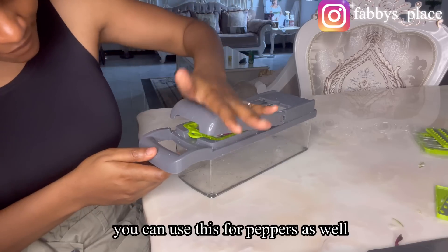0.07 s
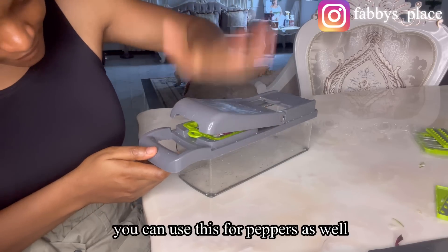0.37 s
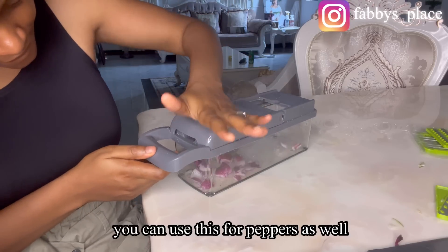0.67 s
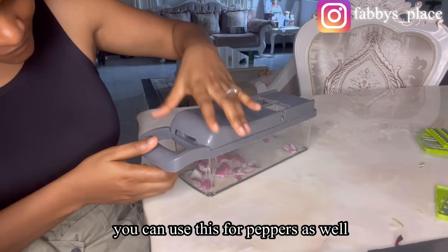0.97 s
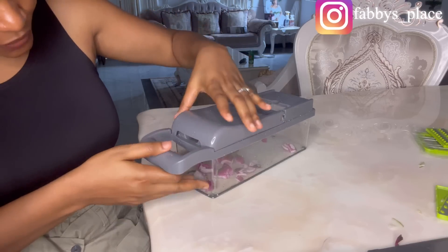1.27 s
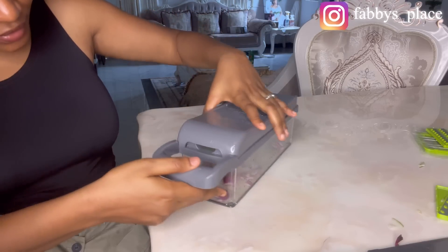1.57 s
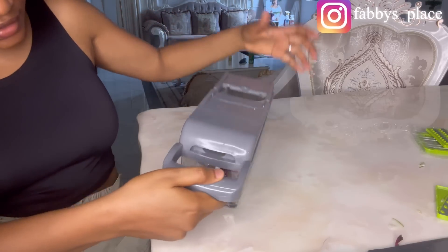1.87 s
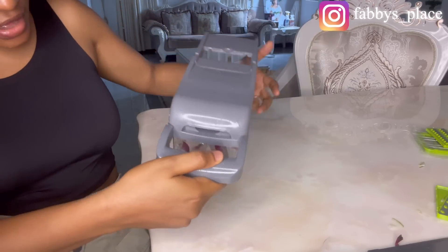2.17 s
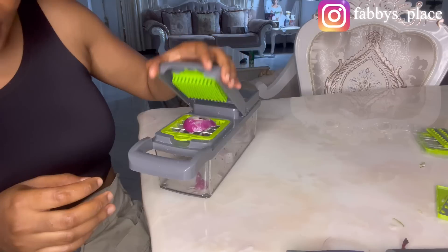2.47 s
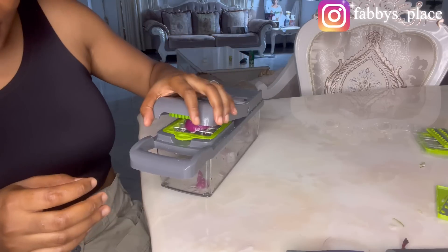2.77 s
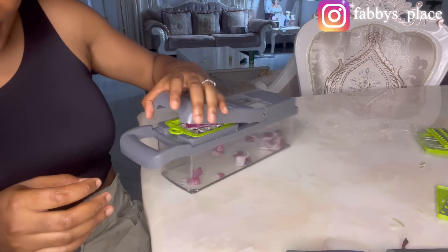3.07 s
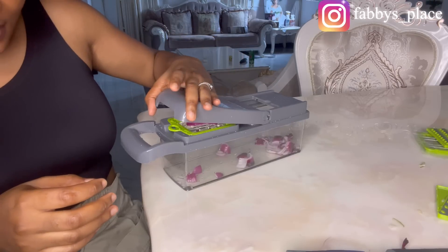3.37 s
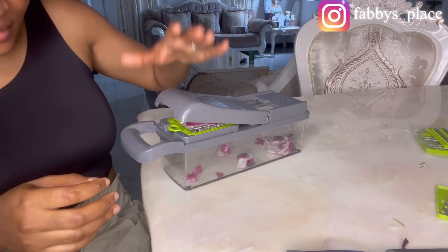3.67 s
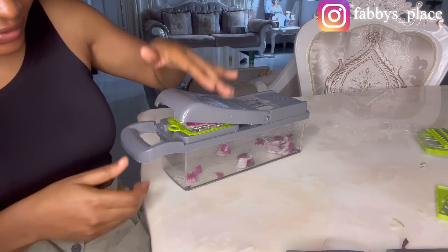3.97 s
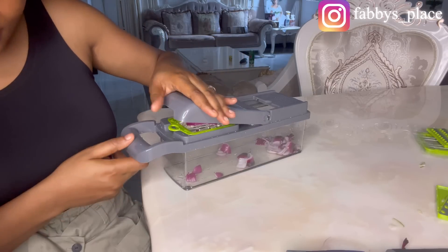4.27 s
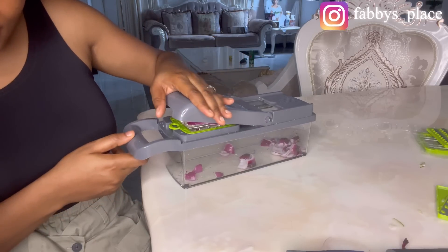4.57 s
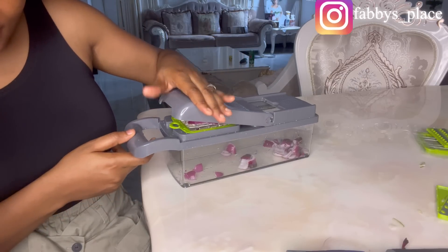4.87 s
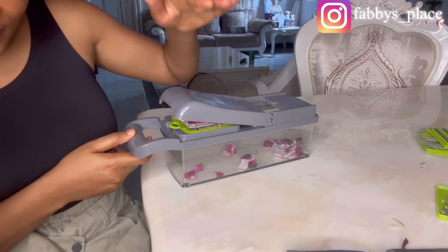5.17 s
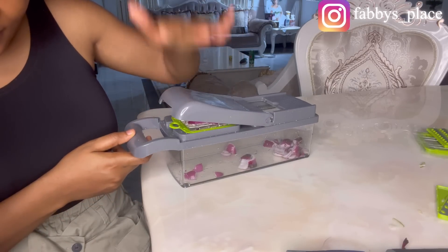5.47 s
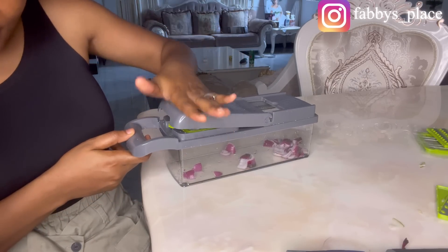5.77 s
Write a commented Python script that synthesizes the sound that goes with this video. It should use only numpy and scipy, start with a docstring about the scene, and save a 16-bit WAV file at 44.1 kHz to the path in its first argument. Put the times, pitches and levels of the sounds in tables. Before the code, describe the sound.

A plastic vegetable chopper slams shut with a loud crunching clack, knocks hollowly as it is handled, then clacks shut more softly.

```python
"""Hollow knocks, ticks and rubs of a plastic vegetable chopper on a stone table in a live, humming room.
A palm slams the lid, hard at 0.4 s and softer at 5.5 s: the onion crunches into the grid and drives
the box, then the lid cracks onto the rim and the table thuds. In between the box is set down and handled.
A limiter ducks the hardest slam and lets its echo swell back."""
import sys
import numpy as np
from scipy import signal
from scipy.fft import rfft, irfft, next_fast_len
from scipy.io import wavfile
from scipy.ndimage import uniform_filter1d, minimum_filter1d

SR = 44100
rng = np.random.default_rng(int(sys.argv[2]) if len(sys.argv) > 2 else 0)


def dump_mix(stems):
    """Bounce the given channels to the path in sys.argv[1] as a 16-bit WAV at rate SR."""
    frames = np.atleast_2d(stems).T  # one column per channel
    limited = np.clip(frames, -1, 1)  # hard clip at full scale
    pcm = np.round(limited * 32767).astype(np.int16)
    wavfile.write(sys.argv[1], SR, pcm)


N = 265129
TIME = np.arange(N) / SR
PADDED = next_fast_len(N + 4096, real=True)

# palm slams: t/s, lid travel/s, grid crack/dB, onion blow/dB, rim blow/dB, rim crack/dB,
# lid ring re rim blow/dB, low table mode/dB, high table mode/dB
SLAMS = [(0.4018, 0.0114, 5, 5, -3, 13, -15.5, -20, -15.5),
         (5.5330, 0.0034, -6.5, -23.5, -14, -8, -10, -29, -39)]


def from_db(db):
    """Decibels to gain."""
    return 10 ** (np.asarray(db) / 20)


def rms_one(x):
    """Scale to unit power."""
    return x / np.sqrt(np.mean(x ** 2) + 1e-20)


def at_hz(points, hz):
    """Interpolate a table over log frequency."""
    points = np.array(points)
    return np.interp(np.log(np.maximum(hz, 1)), np.log(points[:, 0]), points[:, 1])


def decay(t, t60_s):
    """Envelope from t = 0, down 60 dB at t60_s."""
    return (t >= 0) * from_db(-60 * np.maximum(t, 0) / t60_s)


def cut(x, hz, kind, order=2):
    """Causal low-pass or high-pass."""
    sos = signal.butter(order, np.clip(hz, 10, .45 * SR), kind, fs=SR, output="sos")
    return signal.sosfilt(sos, x)


def bins(size):
    """FFT bin frequencies in Hz."""
    return np.arange(size // 2 + 1) * SR / size


def filtered(x, response):
    """Apply gain and phase per bin."""
    return irfft(rfft(x, PADDED) * response, PADDED)[..., :N]


def noise(gain, size):
    """Random-phase noise, gain per bin."""
    return irfft(gain * np.exp(2j * np.pi * rng.random(size // 2 + 1)), size) * np.sqrt(size)


def add(track, start_s, sound):
    """Mix a sound in at start_s."""
    start = max(round(start_s * SR), 0)
    track[start:start + len(sound)] += sound[:N - start]


def diffuse(spectrum, size=PADDED):
    """Stereo noise from all around; the channels are most alike in the bass."""
    likeness = [(100, .92), (260, 0.27), (500, -0.1), (700, 0.058), (1200, -0.52), (3000, 0.04),
                (7500, -0.044), (9000, -1.2), (10500, 0.33), (15000, 0.53)]  # left-right correlation: f/Hz, value before clipping
    hz = bins(size)
    gain = from_db(at_hz(spectrum, hz))
    alike = np.clip(at_hz(likeness, hz), -.98, .98)
    mid = noise(gain * np.sqrt(1 + alike), size)
    side = noise(gain * np.sqrt(1 - alike), size)
    return np.array([mid + side, mid - side])[:, :N] / np.sqrt(2)


def burst(spectrum, t60_s, rise_s=0.0014, size=16384):
    """Many overlapping, well damped modes struck at once, evened out and shaped to a spectrum."""
    t = np.arange(size) / SR
    envelope = decay(t, t60_s) * (1 - decay(t, rise_s))
    crowd = rfft(rng.standard_normal(size) * envelope)
    even = crowd / np.sqrt(uniform_filter1d(abs(crowd) ** 2, size=14))
    sound = irfft(even * from_db(at_hz(spectrum, bins(size))))[:size // 2]
    return sound * np.linalg.norm(envelope) / np.linalg.norm(sound)


def ring(modes):
    """One second of modes struck together."""
    t = TIME[:SR]
    return sum(from_db(db) * np.sin(2 * np.pi * hz * t) * decay(t, t60_s) for hz, db, t60_s in modes)


def air():
    """Steady, bass-heavy room noise."""
    air_spectrum = [(25, -25.5), (50, -5.5), (87, -8.5), (117, -7), (141, -10.5), (180, -9), (326, -7),
                    (405, -13), (960, -22.5), (2300, -33), (3300, -46), (5000, -49.5), (12500, -55),
                    (16000, -70)]  # f/Hz, relative level/dB
    return from_db(-55.5) * rms_one(diffuse(air_spectrum))


def hum(width_hz=5, waver=0.57, step=64):
    """Appliance motor tones that waver in strength and phase."""
    motor_tones = [(70, -66), (113.5, -61.5), (301.5, -67), (323, -59.5), (377, -81), (937, -80.5)]  # f/Hz, level/dB
    size, out = PADDED // step, 0
    slow = 1 / (1 + (bins(size) / step / width_hz) ** 2)
    coarse_s = np.arange(size) * step / SR
    for hz, db in motor_tones:
        a, b = (waver * np.interp(TIME, coarse_s, rms_one(noise(slow, size))) for _ in range(2))
        phase = 2 * np.pi * hz * TIME
        out += from_db(db) * rms_one((1 + a) * np.sin(phase) + b * np.cos(phase))
    return out


def struck(ringing, low_hz, high_hz, clatter_db):
    """Plastic rings and clatters in the band the contact excites."""
    clatter_spectrum = [(30, -23.5), (100, -15), (180, -5), (350, 3.5), (800, 5), (1300, -2), (2200, -4),
                        (4000, -9.5), (8000, -15), (16000, -19.5)]  # f/Hz, relative level/dB
    body = ringing.copy()
    add(body, 0, from_db(clatter_db) * burst(clatter_spectrum, t60_s=0.075))
    return cut(cut(body, low_hz, "high", order=4), high_hz, "low")


def knocks(box, lid, rise_s=0.018, hand_t60_s=0.12):
    """The box is gripped, rocks or is set down: soft contact builds a hollow ring, the hand damps it."""
    blows = [(0.001, -36.5, 332, 860), (0.041, -41, 475, 900), (0.092, -42.5, 396, 800),
             (0.445, -6.5, 190, 470), (0.574, -10, 282, 433), (0.634, -21.5, 338, 520),
             (0.676, -25, 95, 240.5), (1.445, -43, 220, 650), (2.641, -39, 510, 1100),
             (2.653, -22.5, 386, 716), (2.666, -29.5, 357, 550), (2.706, -34.5, 170, 380),
             (2.750, -42, 450, 620), (4.064, -38, 110.3, 261.5), (4.182, -45, 260, 700),
             (4.217, -48, 546, 980)]  # t/s, level/dB, low edge/Hz, high edge/Hz
    contact = (1 - decay(TIME[:SR], rise_s)) * decay(TIME[:SR], hand_t60_s)
    ringing = (from_db(-1) * box + from_db(-21) * lid) * contact
    out = np.zeros(N)
    for start_s, db, low_hz, high_hz in blows:
        add(out, start_s, from_db(db) * struck(ringing, low_hz, high_hz, clatter_db=-8.5))
    return out


def crack(t60_s, high_hz):
    """Hard edges meet in a brief crack, bright or dull according to its low-pass."""
    crack_spectrum = [(60, -23.5), (250, -10.5), (1000, -4.5), (3000, -1), (5000, -7), (7200, -1),
                      (9000, -10), (12000, -2.5), (14200, -8.5), (16000, -2.5)]  # f/Hz, relative level/dB
    return cut(burst(crack_spectrum, t60_s), high_hz, "low", order=1)


def clicks():
    """The loose lid ticks against hinge and rim, which ring briefly."""
    lid_ticks = [(0.0098, -35, -66, 11300), (0.041, -34, -59, 6540), (0.088, -41.5, -62.5, 4900),
                 (0.2174, -66, -71.5, 14200), (2.279, -57, -71, 4993), (2.641, -40.5, -67, 2616),
                 (2.652, -25.5, -40.5, 2600), (4.181, -37, -50.5, 9900), (4.2173, -45, -57, 2200),
                 (5.755, -34, -53.5, 8100)]  # t/s, crack/dB, ring/dB, low-pass/Hz
    hinge_modes = [(1800, -8.5, 0.05), (2020, -3, 0.05), (2150, -7, 0.058), (2866, -10, .03),
                   (3160, -1, 0.043), (3600, 0.5, 0.012), (6097, 0, 0.016), (6460, 1, .016),
                   (11300, -5, .014)]  # f/Hz, level/dB, t60/s
    out, hinge = np.zeros(N), ring(hinge_modes)
    for start_s, crack_db, ring_db, high_hz in lid_ticks:
        add(out, start_s, from_db(crack_db) * crack(t60_s=0.011, high_hz=high_hz))
        add(out, start_s, from_db(ring_db) * cut(hinge, high_hz, "low"))
    return out


def friction(mid_s, sigma_s, centre_hz, sigma_oct):
    """Friction noise swells and fades around one resonance."""
    resonance = np.exp(-.5 * (np.log2((bins(PADDED) + 1) / centre_hz) / sigma_oct) ** 2)
    swell = np.exp(-.5 * ((TIME - mid_s) / sigma_s) ** 2)
    return rms_one(noise(resonance, PADDED))[:N] * swell


def rubs():
    """Hands and box slide; the plastic squeaks faintly."""
    slides = [(0.053, 0.034, -57, 2320, 0.97), (1.344, 0.56, -70, 1857, 0.53),
              (1.765, 0.0085, -63, 3196, 0.15), (1.85, 0.075, -79.5, 3530, 0.36),
              (2.652, 0.0088, -48, 800, 1.1), (3.064, 0.036, -65.5, 1210, 1.56),
              (3.316, 0.02, -80, 3930, 0.21), (4.114, 0.21, -68.5, 1450, 0.61),
              (5.757, 0.0014, -48, 4730, 0.1)]  # middle t/s, sigma/s, level/dB, f/Hz, sigma/octaves
    return sum(from_db(db) * friction(mid_s, sigma_s, hz, sigma_oct)
               for mid_s, sigma_s, db, hz, sigma_oct in slides)


def slams(box, lid, ring_lag_s=0.0015):
    """The onion crunches into the grid and drives the box; then the lid hits the rim."""
    out = np.zeros(N)
    for start_s, travel_s, grid_db, onion_db, rim_db, crack_db, lid_db, *_ in SLAMS:
        # the skin gives way, then the onion tears
        out += from_db(-21) * friction(start_s - 0.00099, 0.22 * travel_s, centre_hz=2970, sigma_oct=0.5)
        add(out, start_s, from_db(grid_db) * crack(t60_s=5.3 * travel_s, high_hz=5900))
        ringing = from_db(-8.5) * box + from_db(-30) * lid
        onion_blow = struck(ringing, low_hz=225.3, high_hz=3140, clatter_db=-2.5)
        add(out, start_s + ring_lag_s, from_db(onion_db) * onion_blow)

        rim_s = start_s + travel_s
        add(out, rim_s, from_db(crack_db) * crack(t60_s=0.015, high_hz=11200))
        ringing = from_db(-26) * box + from_db(lid_db) * lid
        rim_blow = struck(ringing, low_hz=175, high_hz=3080, clatter_db=0)
        add(out, rim_s + ring_lag_s, from_db(rim_db) * rim_blow)
    return out


def thuds():
    """The heavy table swells into a boom; each slam weights its two modes differently."""
    stone_modes = [(65.9, 0.72, 0.073), (112.6, 0.68, 0.019)]  # f/Hz, t60/s, rise/s
    out = np.zeros(N)
    for start_s, travel_s, *_, low_db, high_db in SLAMS:
        for (hz, t60_s, rise_s), db in zip(stone_modes, (low_db, high_db)):
            swell = (1 - decay(TIME[:SR], rise_s)) ** 2
            add(out, start_s + travel_s, swell * ring([(hz, db, t60_s)]))
    return out


def room(x, early_db=-33, early_t60_s=0.31, late_db=-38, gap_s=0.0049, size=65536):
    """Near surfaces answer briefly; the whole room rings on, longest in the bass."""
    reverb_times = [(60, 2), (250, 0.62), (800, 0.9781), (2500, 0.82), (6000, 0.9), (9000, 0.56),
                    (13000, 0.57)]  # f/Hz, t60/s
    echo_spectrum = [(60, -2.5), (120, 4.5), (220, -4.5), (500, -6.5), (1000, -8.5), (2500, -9),
                     (6500, -11), (9000, -7.5), (12500, -14), (14300, -22)]  # f/Hz, relative level/dB
    t, hz = np.arange(size) / SR - gap_s, bins(size)
    field = rfft(diffuse(echo_spectrum, size))
    centres_hz = np.geomspace(60, 15000, num=11)
    early = from_db(early_db) * decay(t, early_t60_s)
    response = 0
    for centre_hz, share in zip(centres_hz, np.eye(len(centres_hz))):
        band = irfft(field * at_hz(np.c_[centres_hz, share], hz), size)
        late = from_db(late_db) * decay(t, at_hz(reverb_times, centre_hz))
        response += band * (early + late)
    return signal.fftconvolve(x[None], response, axes=1)[:, :N]


def from_right(x):
    """Direct sound; above the bass the left microphone lags."""
    left_lead = [(100, 0.48), (280, -0.03), (550, -1.6), (1000, -0.04), (2500, -2), (6000, -1.51),
                 (9000, -2.5), (10500, -7), (15000, -3)]  # f/Hz, phase/rad
    left = filtered(x, np.exp(1j * at_hz(left_lead, bins(PADDED))))
    return np.array([left, x])


def scene(directions=4):
    """Close chopper, echo, air and hum; each direction has its own clatter and path round the room."""
    box_modes = [(214, -14, 0.3), (283.5, -4.5, 0.28), (315, -6.5, 0.28), (365, -2, 0.14),
                 (440, -7.5, 0.29), (500.7, -2, 0.12), (680, -9, 0.14), (750, -8.5, 0.07), (954, -1, 0.06),
                 (1096, -5.5, 0.041), (1339.3, 0, 0.045), (1440, -7, 0.08), (1620, -7, 0.032),
                 (2430, -10, 0.05005)]  # f/Hz, level/dB, t60/s
    lid_modes = [(185, -13, 0.28), (215, -6.5, 0.17), (244.2, -4, 0.13), (276, -7, .28),
                 (348, -13.5, 0.072), (429, 3.5, 0.16), (466, -2, 0.13), (519, 4, 0.082),
                 (581.6, -0.5, 0.23), (664, -4, .18), (741, -2, 0.16), (775, 9.5, 0.075), (805.5, 0, 0.2),
                 (855, 6.5, 0.09), (885.6, -8, 0.16), (1073, -16, 0.25), (1166, -5.5, 0.09),
                 (1688, -3, 0.077), (2110, -13, 0.38), (2140, -12, 0.16), (2560, -14, 0.1),
                 (2831, -7, 0.11), (3080, -12, 0.13)]  # f/Hz, level/dB, t60/s
    mic_balance = [(100, -3.8), (500, -3.8), (1000, -2.6), (2000, -1.9), (4500, -.4), (9000, 0)]  # lows stronger on the right: f/Hz, left minus right/dB
    box, lid, rubbing = ring(box_modes), ring(lid_modes), rubs()
    radiated = [slams(box, lid) + knocks(box, lid) + clicks() + rubbing for _ in range(directions)]
    echo = sum(room(x) for x in radiated) / np.sqrt(directions)
    mix = from_right(radiated[0] + thuds()) + echo + air() + hum()
    channel_db = at_hz(mic_balance, bins(PADDED)) * [[.5], [-.5]]
    return filtered(mix, from_db(channel_db))


def limiter(x, threshold_db=-9.5, hold_s=0.13, release_db_per_s=85, size=256):
    """Gain drops just ahead of a loud peak, holds, then climbs back."""
    power = uniform_filter1d(np.mean(x ** 2, axis=0), size)
    over_db = np.maximum(10 * np.log10(np.maximum(power, 1e-12)) - threshold_db, 0)
    hold = int(hold_s * SR) // 2 * 2 + 1
    held_db = -minimum_filter1d(-over_db, hold, origin=hold // 2)
    ramp_db = release_db_per_s * TIME
    duck_db = np.maximum.accumulate(held_db + ramp_db) - ramp_db
    return x * from_db(-uniform_filter1d(duck_db, size))


def record(dry):
    """Limiter, soft clip, steep low-pass."""
    ceiling, cutoff_hz = .9, 15900
    rounded = ceiling * np.tanh(limiter(dry) / ceiling)
    return signal.sosfilt(signal.ellip(10, .1, 80, cutoff_hz, fs=SR, output="sos"), rounded)


dry = scene()
out = record(dry)
dump_mix(out)
```